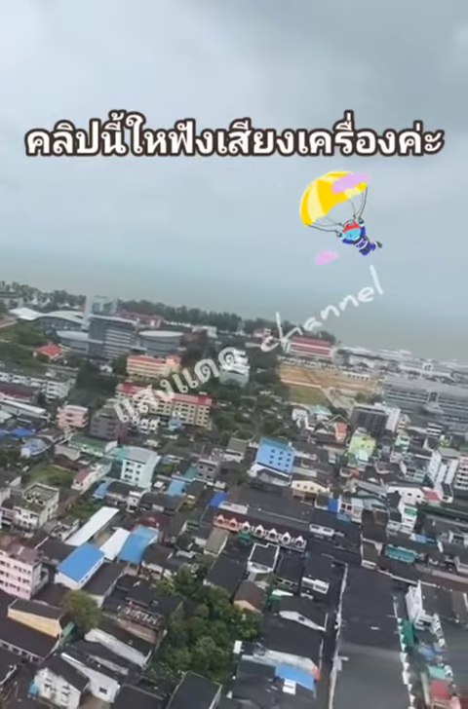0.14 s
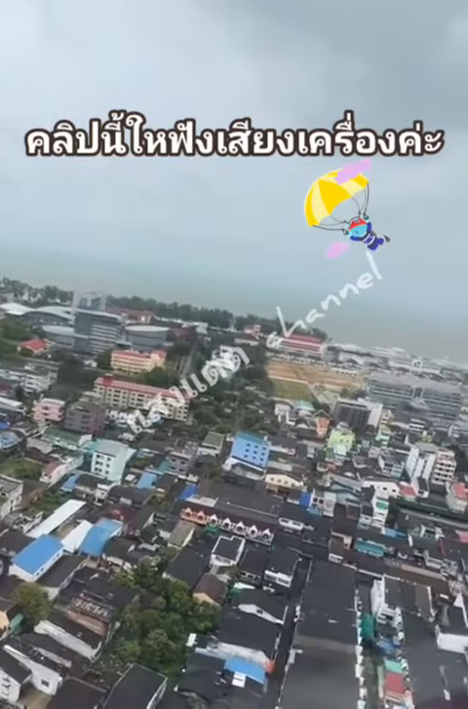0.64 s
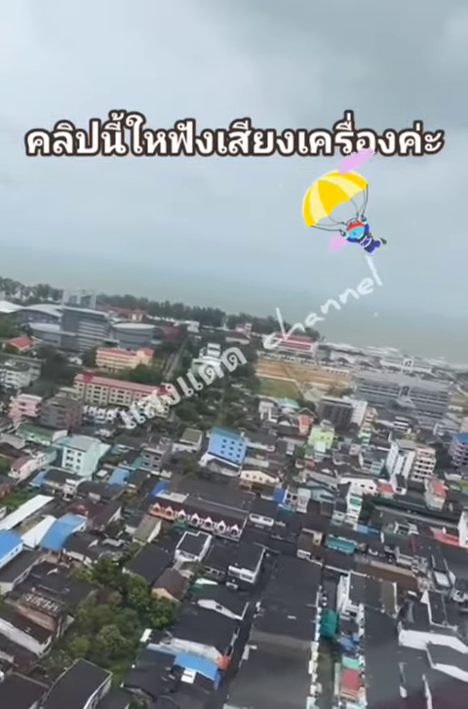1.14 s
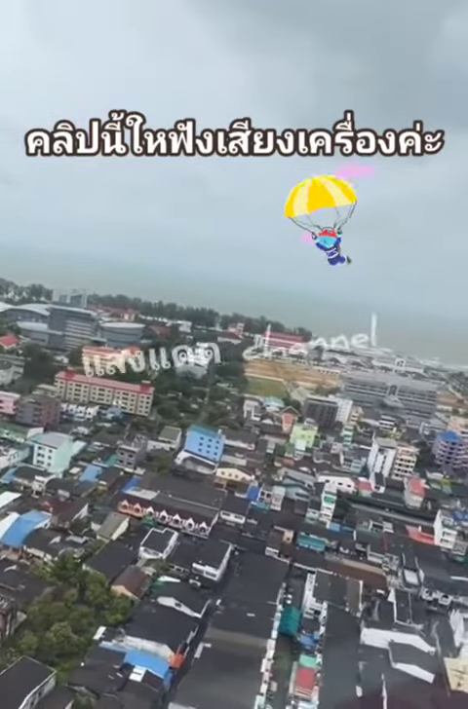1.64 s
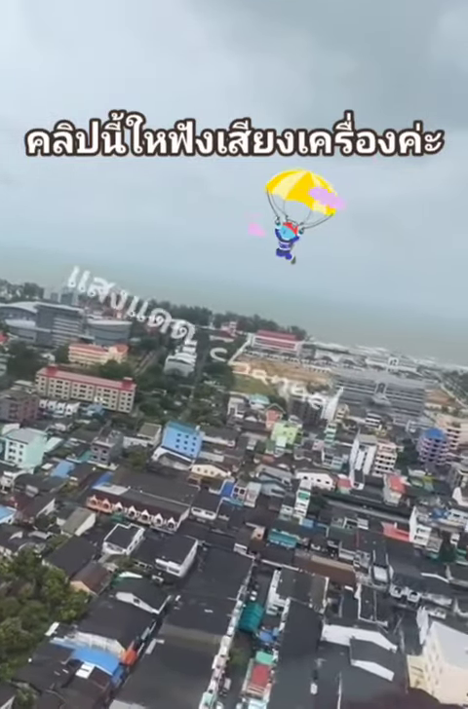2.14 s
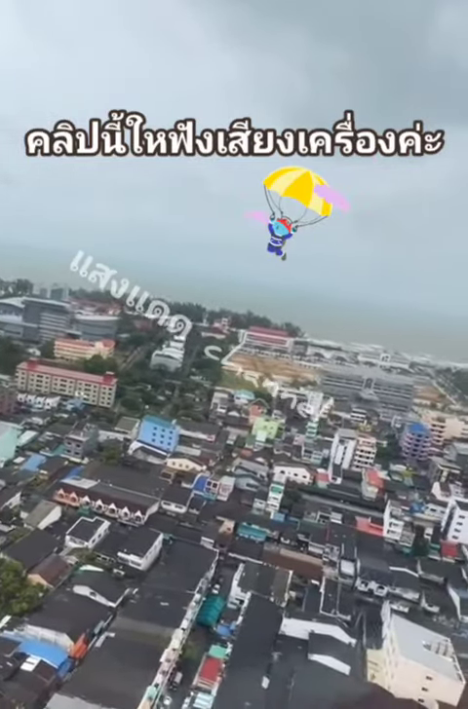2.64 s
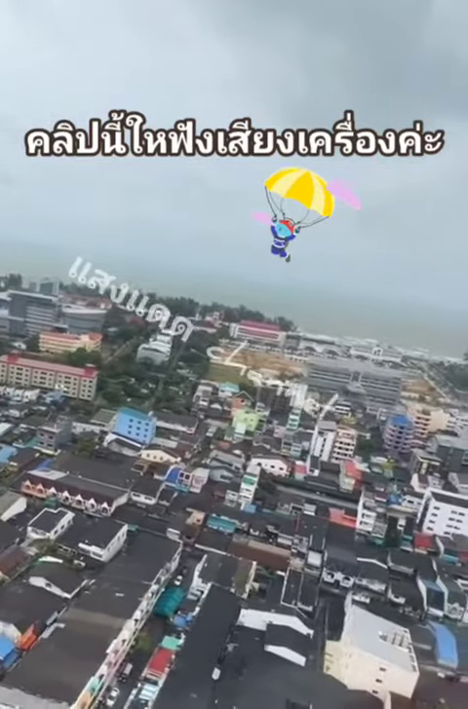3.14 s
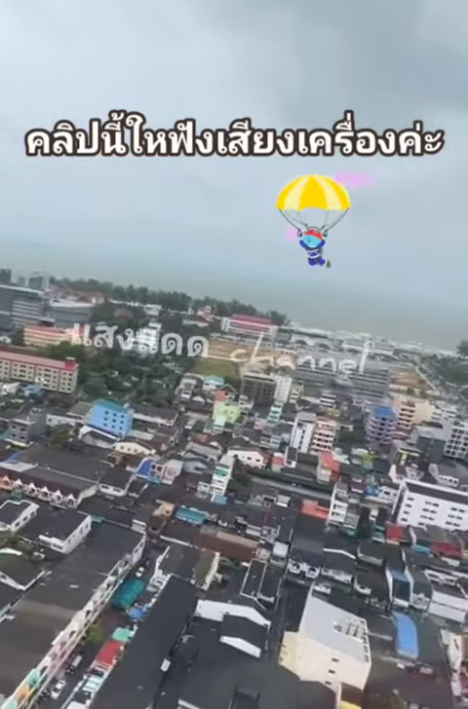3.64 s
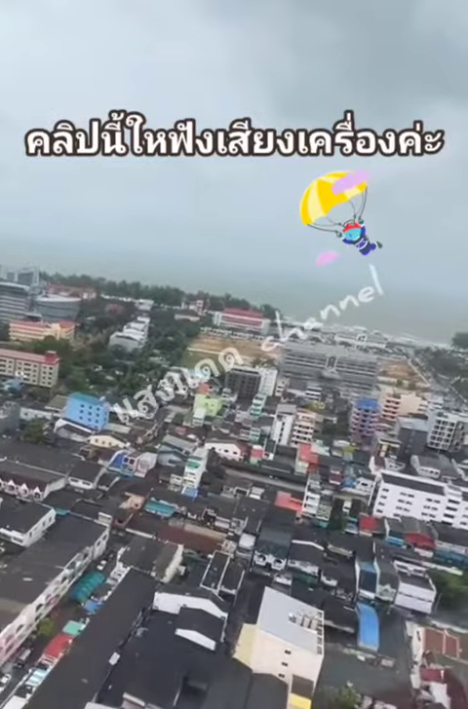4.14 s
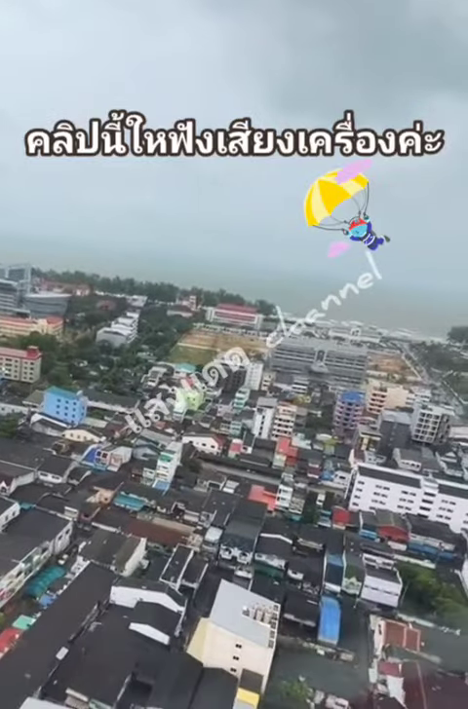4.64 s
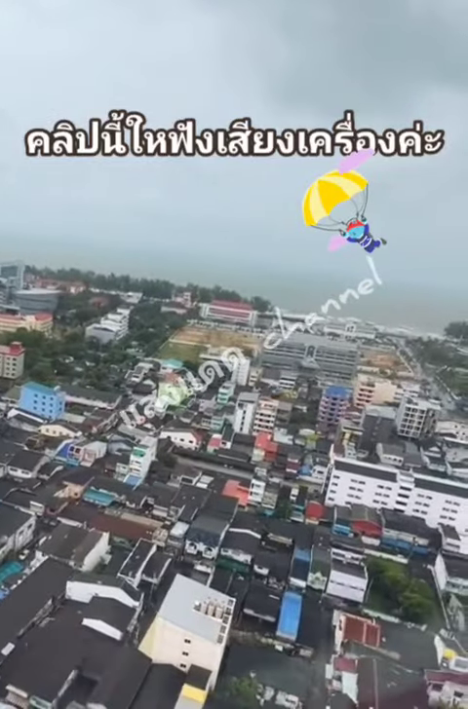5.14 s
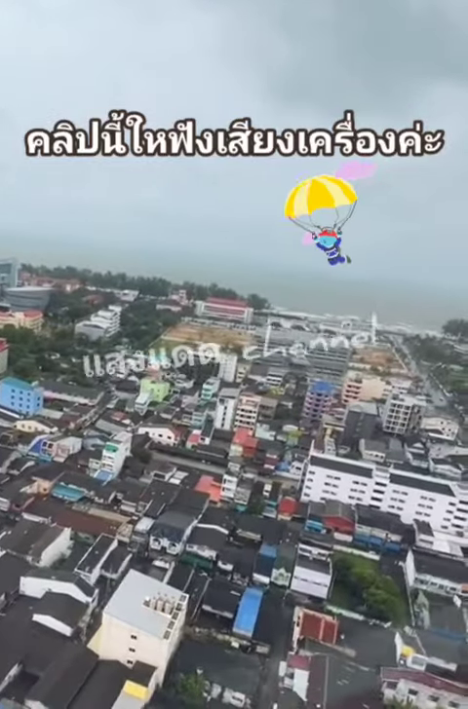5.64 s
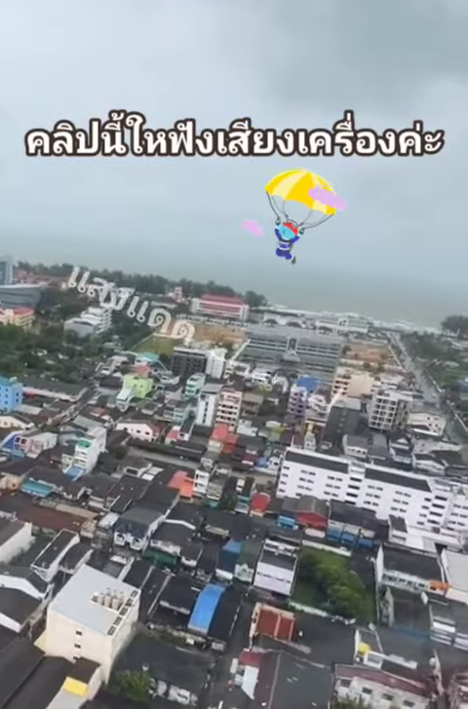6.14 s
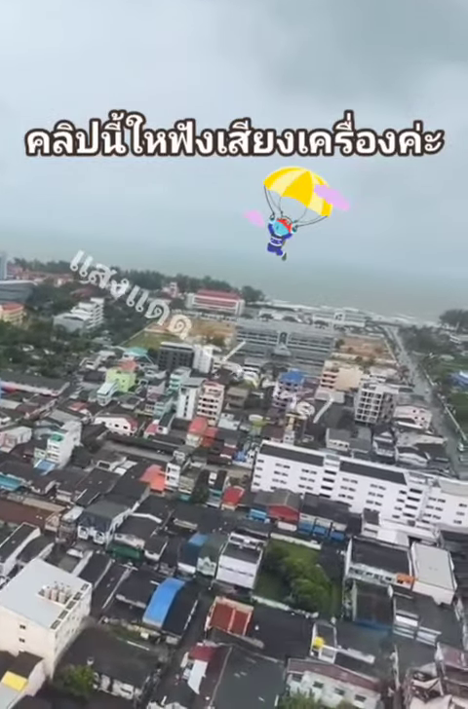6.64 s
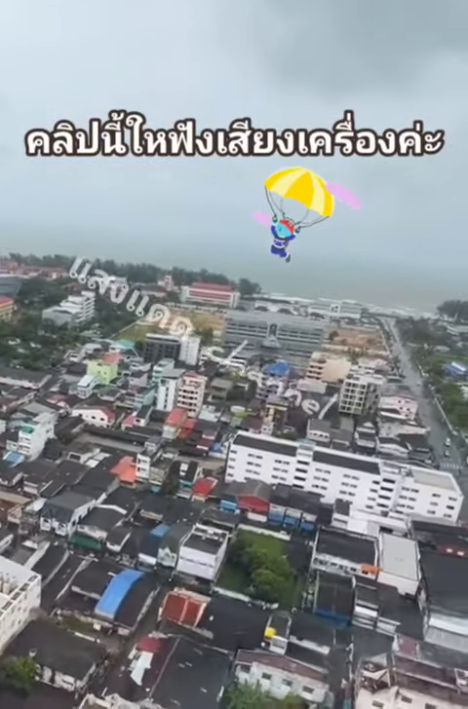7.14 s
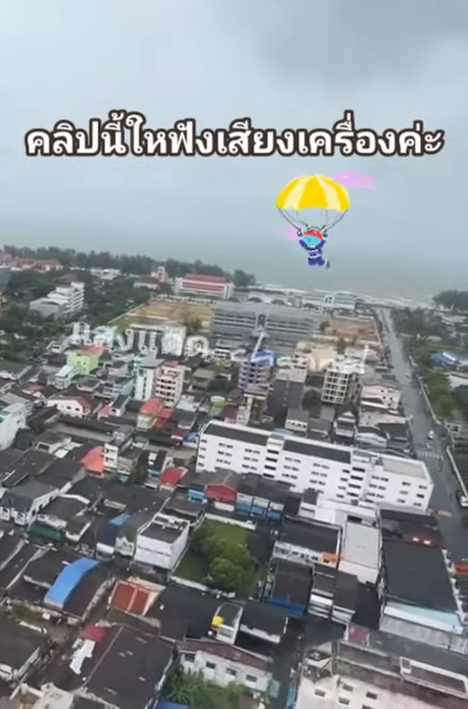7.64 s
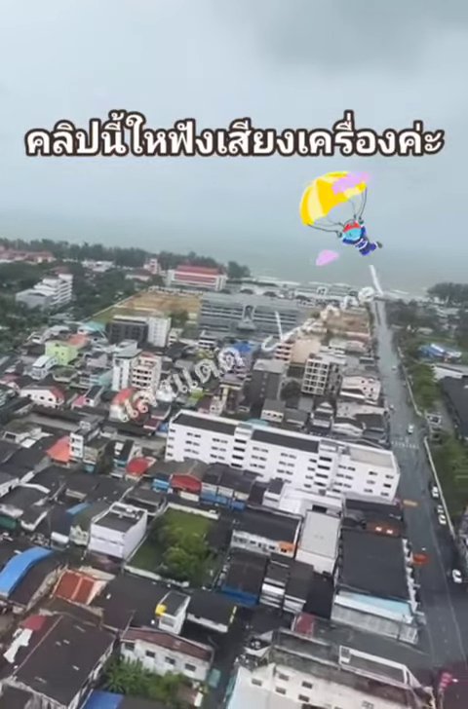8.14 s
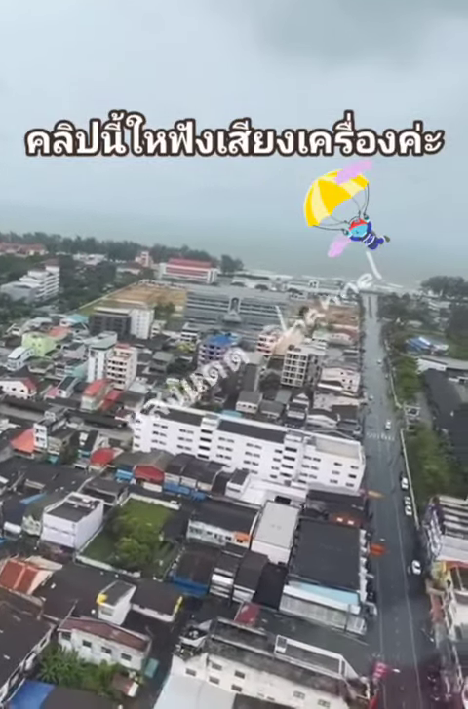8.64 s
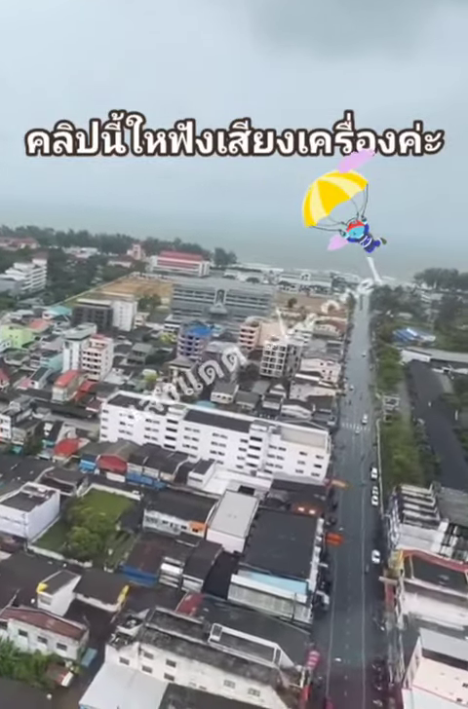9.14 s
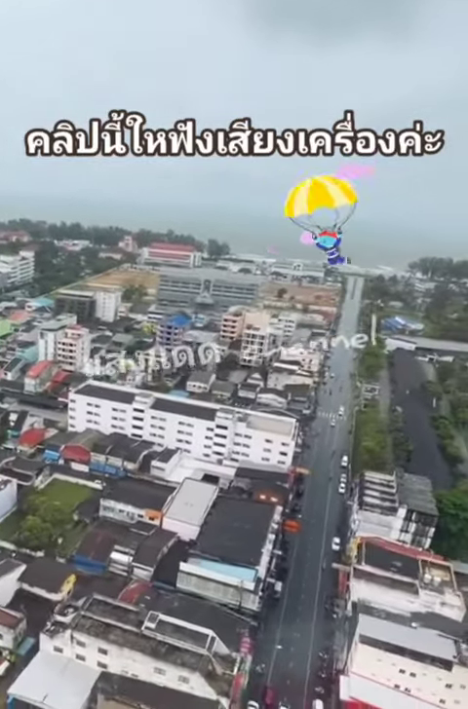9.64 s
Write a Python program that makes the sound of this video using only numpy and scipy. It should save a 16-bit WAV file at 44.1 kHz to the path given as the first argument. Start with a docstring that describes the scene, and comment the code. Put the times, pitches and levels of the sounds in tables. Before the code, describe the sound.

Steady in-flight helicopter noise, close and enclosed, in stereo. A heavy low drone throbs slowly early on, then evens out, over fast rapid-fire blade pulses and rumbling air. A medium-high gear whine leans left, shrill overtones come and go faintly, and soft hiss and turbine whistle flutter with the blades. The speed never noticeably changes, and it cuts off while still running.

```python
"""Inside the cabin of a small helicopter in level flight, heard by a pair of microphones.
One shaft drives everything: blades pass about 25 times a second, and a deep hum, blade tones and gear
whines are sines on fixed multiples of that rate. Shaped noise makes the low buffeting and hollow slap
of the blades and the rush of air, swelling once a blade in places. A thin turbine whistle, an unsteady
sine of its own pitch, comes through once a blade."""
import sys
import numpy as np
from scipy import signal
from scipy.fft import irfft, next_fast_len
from scipy.io import wavfile
from scipy.ndimage import uniform_filter1d

SR = 44100
rng = np.random.default_rng(int(sys.argv[2]) if len(sys.argv) > 2 else 0)


def invert_db(level):
    """Linear amplitude ratio for a level in decibels (20 dB per decade), elementwise."""
    return 10 ** (np.asarray(level, dtype=float) / 20)


def pcm_store(signal):
    """Save signal as 16-bit PCM."""
    levels = np.round(np.clip(np.atleast_2d(signal), -1, 1) * 32767)
    wavfile.write(sys.argv[1], SR, levels.astype(np.int16).T)


N = 430857  # length in samples

# how fast the blades pass: start_s, rate_hz
BLADE_RATE = [(0, 25.221), (.3, 25.204), (1.2, 25.215), (2.1, 25.246), (2.7, 25.235), (3, 25.213),
              (3.3, 25.246), (3.6, 25.193), (4.8, 25.218), (5.1, 25.198), (5.7, 25.244), (6, 25.252),
              (6.3, 25.24), (6.6, 25.2), (7.2, 25.189), (8.1, 25.15), (8.4, 25.154), (9.77, 25.24)]
# strong tones of rotor, shafts and gears, before their swells:
# multiple (of the blade rate), level_db (rms), left_over_right_db, left_lead_rad
STRONG_TONES = [(2.0, -26, 0, -0.0), (4.0, -27, -1, -0.0), (5.0, -30, -1, -0.1), (6.0, -27, -1, 0.0),
                (7.0, -30, -1, -0.1), (11.0, -33, -3, -0.0), (25.0, -43, -6, -0.7), (46.94, -48, -6, 1.0),
                (50.0, -43, -2, -2.6), (55.317, -34, 13, 0.4), (88.667, -46, -1, 1.1),
                (177.333, -59, 3, -0.4), (266.0, -72, -1, 1.0)]
# one shaft tone that holds its level: multiple, level_db (rms), left_over_right_db, left_lead_rad
STEADY_TONE = (14.167, -27, -5, 0)
# faint tones of shafts and gears, before trim and drift:
# multiple, level_db (rms), left_over_right_db, left_lead_rad
FAINT_TONES = [(2.448, -33, 0, -0.0), (5.397, -35, -1, 0.0), (12.0, -39, -3, -0.2), (13.0, -44, -2, 0.1),
               (14.0, -40, -3, 0.1), (15.0, -45, -4, 0.4), (23.333, -48, -3, -2.4), (26.0, -53, -6, 0.8),
               (28.333, -51, 11, 2.3), (34.032, -51, -3, 1.1), (38.563, -60, 10, -1.7),
               (41.151, -62, 3, 0.4), (49.0, -60, -2, 1.3), (51.0, -50, -2, 1.5), (52.0, -63, -1, 1.0),
               (54.317, -61, 15, -0.2), (56.317, -61, 6, 0.6), (57.317, -65, -1, 0.4),
               (59.317, -67, 1, -0.2), (63.675, -67, 0, 0.2), (69.484, -71, 2, -0.4), (74.583, -65, 1, 0.0),
               (74.984, -67, 3, 0.3), (75.385, -69, 1, 0.1), (75.984, -70, 6, -0.0), (86.468, -61, -2, 0.1),
               (86.667, -57, -2, 0.4), (87.667, -57, -3, -0.6), (89.667, -58, -1, 1.1),
               (90.667, -57, 4, 0.5), (90.865, -61, -4, 2.6), (93.885, -58, 11, -2.3), (98.0, -67, 1, 0.4),
               (102.667, -66, 5, 1.7), (110.635, -68, -1, 3.1)]
# swing of the six lowest strong tones, which come from the blades: share (of BLADE_CLARITY), offset_db
BLADE_TONE_SWING = [(.15, 0), (.15, 0), (.7, 0), (1.4, .5), (1.2, 0), (1, 0)]
# how firmly the blade tones stand out of the rumble, before each tone's share: start_s, level_db
BLADE_CLARITY = [(0, -7), (.85, -6), (1.2, 0), (2, 2), (2.9, 2.5), (3.4, 0), (3.9, 3.5), (4.25, 3),
                 (4.55, -2.5), (5.4, 0), (6.1, -2), (6.6, 3.5), (7.25, 3), (7.65, -4), (8.3, 0), (9.2, -5),
                 (9.77, -5)]
# swell of the gear whines: start_s, loudest_db, fading_db (those that fade)
WHINE_SWELL = [(0, -0.5, 2.5), (1.2, -2.5, 4), (2.1, 1.5, 2.5), (2.9, -0.5, 1.5), (3.5, -2, 1),
               (4.5, 1, -2), (5.5, 0.7, 0.5), (6.2, 1, 1), (7.4, 0.5, -1), (8.1, -2, -4.5), (9.3, -2, -5),
               (9.77, 0, -1.5)]
# spells in which a shrill overtone sings out, adding where they overlap:
# multiple (of the blade rate), start_s, end_s, rise_db (over its rest level)
SHRILL_SPELLS = [(177.333, -.2, 3.95, 12), (177.333, 1.15, 1.95, 4), (177.333, 4.5, 5.35, 3),
                 (177.333, 5.45, 6.5, 14), (177.333, 9.2, 9.65, 8), (266.0, 1.85, 2.55, 6),
                 (266.0, 8.1, 8.52, 19)]
# the third blade tone, which beats against the hum: start_s, level_db (rms)
THIRD_TONE = [(.5, -36), (1.3, -24), (2.6, -29), (3.5, -32), (5, -45), (9.77, -45)]
# brief dips of the hum: centre_s, change_db
HUM_DIPS = [(1.12, -2), (6.05, -2), (7.6, -3), (8.45, -1.5), (9.17, -6)]
# air load on the blades, before each layer's share: start_s, load_db
AIR_LOAD = [(0, -4), (.35, 1), (.65, -2), (1.25, 3), (1.5, 0), (1.85, 4), (2.3, -0.5), (2.65, 4.5),
            (3.3, 2.5), (3.55, 5), (3.9, 4), (4.45, -1.5), (4.95, 3), (5.2, -1.5), (5.5, 3), (6, -3),
            (6.6, 2.5), (7.35, 1.5), (7.65, -3.5), (8.45, .5), (9, -0.5), (9.4, 4), (9.77, -0.5)]
# gusts that shake the cabin, added to the buffeting: centre_s, rise_db
CABIN_GUSTS = [(.3, 1), (1.8, 0.5), (6.2, 4), (6.8, 1), (7.9, 2), (9.48, 4)]
# spectrum of the cabin vibration, before the blades shape it: pitch_hz, density_db (per Hz)
RUMBLE_SPECTRUM = [(25, -61), (40, -58), (55, -44), (80, -43), (130, -44.5), (200, -45), (260, -47),
                   (330, -53), (400, -57), (470, -54), (540, -55), (600, -62), (700, -64)]
# spectrum of the rush of air, before blurred whistles and breathing: pitch_hz, density_db (per Hz)
RUSH_SPECTRUM = [(700, -67), (820, -65.5), (1000, -72.5), (1150, -68), (1450, -74), (1700, -83),
                 (2050, -77.5), (2230, -72.5), (2450, -77.5), (3000, -84), (3900, -87.5), (5600, -85.5),
                 (7600, -91), (11500, -93.5), (13100, -99.5), (15000, -104)]
# blurred whistles in the rush: pitch_hz, rise_db (over the rush)
BLURRED_WHISTLES = [(2103, 8), (3460, 5), (4000, 4), (4510, 4), (5365, 5), (6330, 3)]
# noise at the two microphones: pitch_hz, likeness (0-1), left_lead_rad, left_over_right_db
MICROPHONE_PAIR = [(30, 0.94, 0.0, 0.0), (60, 0.996, 0, -0.3), (250, 0.985, 0, -0.7),
                   (360, 0.93, 0.2, -3.2), (400, 0.45, 0.6, 2.3), (500, 0.92, 0.0, 1.8),
                   (600, 0.25, 0.4, -1.2), (740, 0.4, 1.7, 3.7), (950, 0.25, -1.4, 2.2),
                   (1130, 0.69, 0.3, 0.2), (1250, 0.22, 1.3, -1.0), (1500, 0.65, 0.2, 0.6),
                   (1950, 0.61, 0.0, 0.9), (2400, 0.19, 0.8, 0.9), (3100, 0.07, 3.1, 0.3),
                   (3900, 0.6, -0.1, -0.3), (5500, 0.51, -2.3, 0.0), (7200, 0.1, -1.0, -0.3),
                   (8400, 0.65, -0.7, -0.4), (10500, 0.43, -1.4, -0.6), (14000, 0.12, -1.1, 0.1)]
# turbine whistle, before boost and flutter: start_s, pitch_hz, level_db (rms)
TURBINE_WHISTLE = [(0, 8440, -64), (.35, 8428, -59.5), (1.55, 8468, -67), (2, 8435, -60.5),
                   (3.05, 8365, -59.5), (3.6, 8435, -66), (3.95, 8420, -64), (4.3, 8420, -57),
                   (5.1, 8425, -57.5), (6.1, 8360, -62), (6.6, 8340, -59.5), (7.5, 8400, -61.5),
                   (8.3, 8480, -62.5), (9.1, 8535, -60), (9.77, 8400, -60.5)]

HUM_MULTIPLE, HUM_DB = 3.0575, -14.0  # multiple of the blade rate; rms outside the dips
HUM_DIP_S, BEAT_DIP_S = .07, .49  # width of a dip; when hum and third tone first oppose
BLADE_DRIFT_DB = 1.5
SPELL_REST_DB, SPELL_EDGE_S, SPELL_FLICKER_DB = -10, .05, 1.2
GUST_S = 0.11
BLUR_WIDTH = .006  # share of the pitch
KNEE, CEILING = .7, .95  # peak level, full scale 1


def follow(rows):
    """Columns of a time table, one value a sample."""
    s, *columns = np.transpose(rows)
    return [np.interp(np.arange(N) / SR, s, column) for column in columns]


def wander(rate_hz):
    """Smooth chance of rms about 1, with changes up to about rate_hz."""
    steps = int(N / SR * rate_hz * 8) + 16
    slow = uniform_filter1d(rng.standard_normal(steps), size=4)
    slow = uniform_filter1d(slow, size=4)
    return np.interp(np.arange(N), np.linspace(0, N, steps), slow / slow.std())


def bumps(rows, width_s):
    """Brief bell-shaped rises or dips in level, in dB."""
    t = np.arange(N) / SR
    return sum(db * np.exp(-((t - s) / width_s) ** 2) for s, db in rows)


def noise(spectrum, low_hz, high_hz):
    """Two-microphone noise with the given spectrum, taken between two soft edges."""
    size = next_fast_len(N)
    hz = np.fft.rfftfreq(size, 1 / SR) + 1

    def read(pitch_hz, values):
        return np.interp(np.log(hz), np.log(pitch_hz), values)

    pitch_hz, likeness, lead, side_db = np.transpose(MICROPHONE_PAIR)
    likeness = np.clip(read(pitch_hz, likeness), 0, 1)
    a, b, c, d = rng.standard_normal((len(hz), 4)).T
    left = a + 1j * b
    shared = likeness * np.exp(-1j * read(pitch_hz, lead)) * left
    right = shared + np.sqrt(1 - likeness ** 2) * (c + 1j * d)
    edges = 1 / np.sqrt((1 + (low_hz / hz) ** 16) * (1 + (hz / high_hz) ** 16))
    blur_db = sum(db * np.exp(-((hz / at - 1) / BLUR_WIDTH) ** 2) for at, db in BLURRED_WHISTLES)
    level = invert_db(read(*np.transpose(spectrum)) + blur_db) * edges
    level *= np.sqrt(size * SR / 4)  # from dB per Hz to the size of a spectrum line
    tilt = invert_db(read(pitch_hz, side_db) / 2)
    return irfft(np.array([left * tilt, right / tilt]) * level, size)[:, :N]


def beat(passes, at, sharp):
    """A swell once a blade, centred on the part of the pass at; mean power 1."""
    shape = np.exp(sharp * np.cos(2 * np.pi * (passes - at)))
    return shape / np.sqrt(np.mean(shape ** 2))


def tone(cycles, db, side_db, lead):
    """One sine as both microphones hear it."""
    spin = np.exp(2j * np.pi * cycles) * invert_db(db)
    ears = invert_db([side_db / 2, -side_db / 2])
    ears = ears / np.sqrt(np.mean(ears ** 2) / 2) * np.exp([1j * lead, 0])
    return (ears[:, None] * spin).real


def spells(multiple):
    """Level in dB of an overtone that rests low and sings out in spells."""
    t = np.arange(N) / SR

    def edge(s):
        return .5 + .5 * np.tanh(s / SPELL_EDGE_S)

    mine = [row[1:] for row in SHRILL_SPELLS if abs(row[0] / multiple - 1) < .1]
    singing_db = sum(db * edge(t - start) * edge(end - t) for start, end, db in mine)
    return SPELL_REST_DB + SPELL_FLICKER_DB * wander(3) + singing_db


def swells():
    """How each strong tone swells and fades, in dB: blade tones, then whines, then shrill overtones."""
    loudest_db, fading_db = follow(WHINE_SWELL)
    clarity_db = follow(BLADE_CLARITY)[0]
    low = [share * clarity_db + db + BLADE_DRIFT_DB * wander(1.5) for share, db in BLADE_TONE_SWING]
    whines = [0, fading_db, 0, loudest_db, fading_db]
    shrill = [spells(row[0]) for row in STRONG_TONES[-2:]]
    return low + whines + shrill


def gearing(passes):
    """Tones locked to the shaft; the cabin lets all but one drift a little in level and phase."""
    out = np.zeros((2, N))
    passes = passes + .0004 * wander(18)  # the shaft twists to and fro, blurring high tones most
    for (multiple, db, side_db, lead), swell_db in zip(STRONG_TONES, swells()):
        drift = rng.random() + .025 * wander(3)
        level_db = db + swell_db + .8 * wander(6)
        out += tone(multiple * passes + drift, level_db, side_db, lead)
    multiple, *level = STEADY_TONE
    out += tone(multiple * passes + rng.random(), *level)
    for multiple, db, side_db, lead in FAINT_TONES:
        drift = rng.random() + .05 * wander(2)
        level_db = db - .3 + 2.5 * wander(2)
        out += tone(multiple * passes + drift, level_db, side_db, lead)
    return out


def drone(passes):
    """The deep hum throbs slowly against the third blade tone just below it."""
    start = rng.random()
    hum_db = HUM_DB + bumps(HUM_DIPS, HUM_DIP_S)
    hum = tone(HUM_MULTIPLE * passes + start, hum_db, -0.5, 0)
    # half a cycle apart at the first dip of the beat
    opposed = start + .5 + (HUM_MULTIPLE - 3) * passes[round(BEAT_DIP_S * SR)]
    third = tone(3 * passes + opposed, follow(THIRD_TONE)[0], -0.45, 0)
    return hum + third


def blades(passes):
    """Each blade sends a gust of low buffeting and a short hollow slap, both growing with the air load."""
    load_db = follow(AIR_LOAD)[0]
    steady = noise(RUMBLE_SPECTRUM, 1, 70)  # the lowest rumble keeps an even level
    buffet_db = 0.58 * load_db + bumps(CABIN_GUSTS, GUST_S) + 0.16 + 0.8 * wander(10)
    buffet = noise(RUMBLE_SPECTRUM, 75, 389) * invert_db(buffet_db) * beat(passes, 0.41, 0.27)
    uneven_db = 1.5 * wander(25)  # no two slaps alike
    slap_db = 1.02 * load_db - 0.84 + uneven_db
    slap = noise(RUMBLE_SPECTRUM, 408, 625) * invert_db(slap_db) * beat(passes, 0.26, 0.66)
    return steady + buffet + slap


def airstream(passes):
    """Rush with cabin resonances, its upper bands breathing apart; the blades chop its top lightly."""
    edges_hz = [1100, 2000, 3200, 4500, 6500, 8800]
    load_db = uniform_filter1d(follow(AIR_LOAD)[0], size=SR // 2)
    roar = noise(RUSH_SPECTRUM, 557, edges_hz[0]) * invert_db(0.53 * load_db)  # grows with the blade slap
    body = np.zeros((2, N))
    for low_hz, high_hz in zip(edges_hz, edges_hz[1:]):
        body += noise(RUSH_SPECTRUM, low_hz, high_hz) * invert_db(0.81 * wander(7))
    hiss = noise(RUSH_SPECTRUM, edges_hz[-1], 20000)
    hiss = hiss * beat(passes, 0.47, 0.23) * invert_db(0.88 * wander(12))
    return roar + body + hiss


def turbine(passes):
    """A thin whistle, unsteady in pitch and level, that comes through once a blade."""
    pitch_hz, db = follow(TURBINE_WHISTLE)
    cycles = np.cumsum(pitch_hz + 22 * wander(60)) / SR
    level_db = db + 3.5 + 2.3 * wander(30)
    return tone(cycles, level_db, -.6, -1.13) * beat(passes, 0.65, 1.13)


def scene():
    """All sources in the cabin, timed by one running count of blade passes."""
    passes = np.cumsum(follow(BLADE_RATE)[0]) / SR
    return gearing(passes) + drone(passes) + blades(passes) + airstream(passes) + turbine(passes)


def rounded(x):
    """The microphones round off the highest peaks."""
    over = np.maximum(abs(x) - KNEE, 0)
    room = CEILING - KNEE
    return x - np.sign(x) * (over - room * np.tanh(over / room))


def top_cut(x):
    """Nothing passes above the cut-off."""
    return signal.sosfilt(signal.butter(12, 15450, fs=SR, output="sos"), x)


def record(dry):
    """Rounded peaks and a 4 ms fade at the end."""
    fade = np.minimum((N - np.arange(N)) / (.004 * SR), 1)
    mix = rounded(dry) * fade
    return top_cut(mix)


dry = scene()
out = record(dry)
pcm_store(out)
```